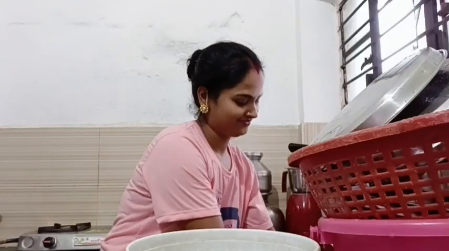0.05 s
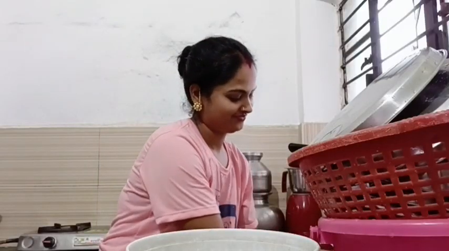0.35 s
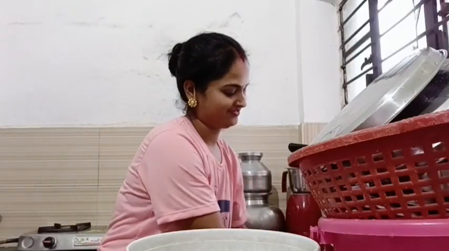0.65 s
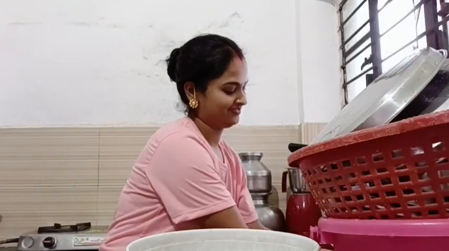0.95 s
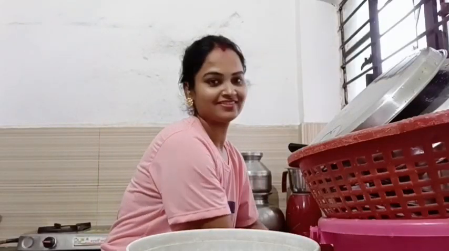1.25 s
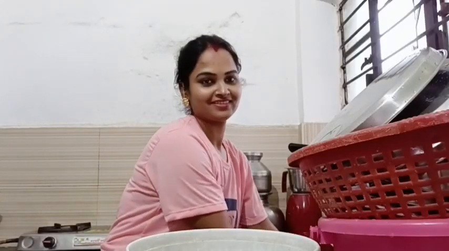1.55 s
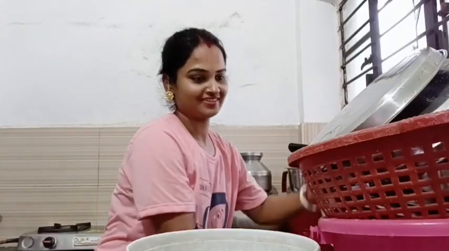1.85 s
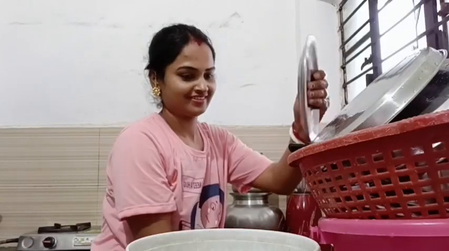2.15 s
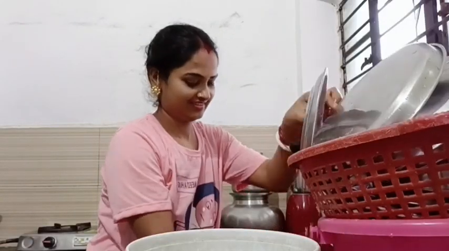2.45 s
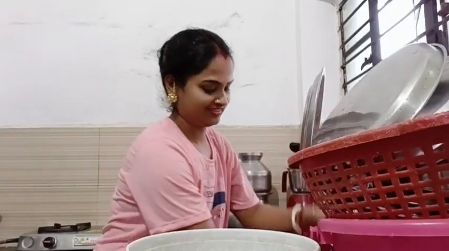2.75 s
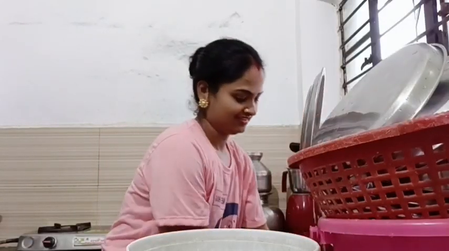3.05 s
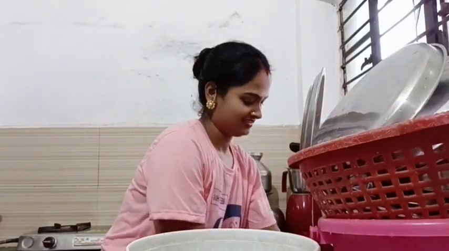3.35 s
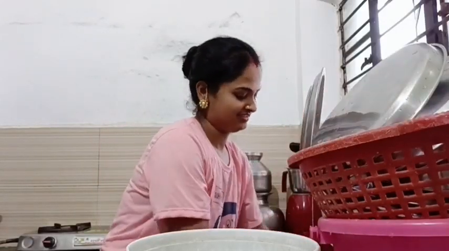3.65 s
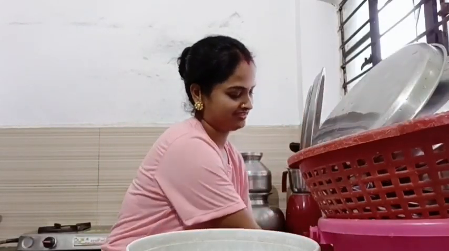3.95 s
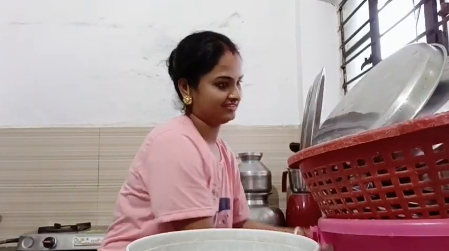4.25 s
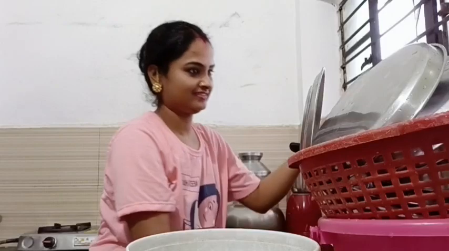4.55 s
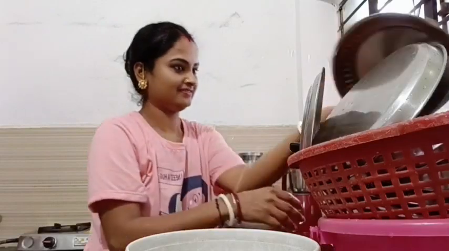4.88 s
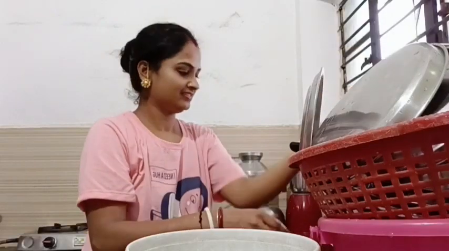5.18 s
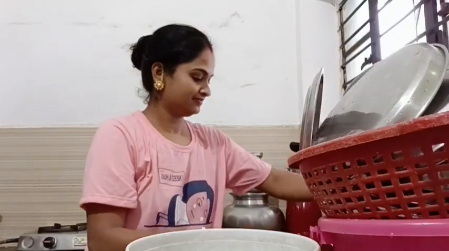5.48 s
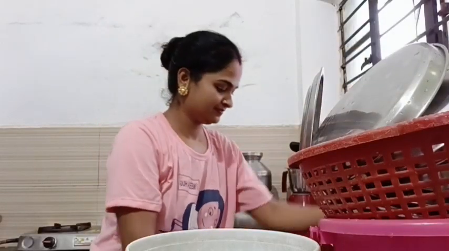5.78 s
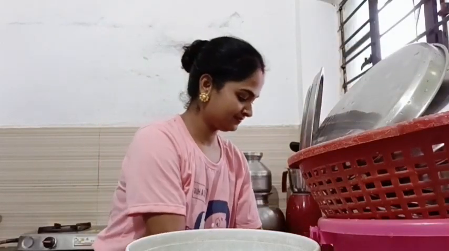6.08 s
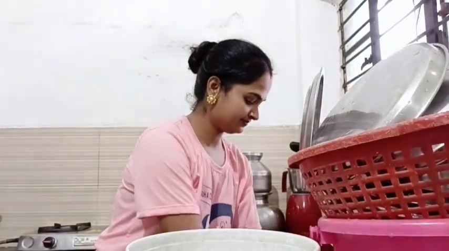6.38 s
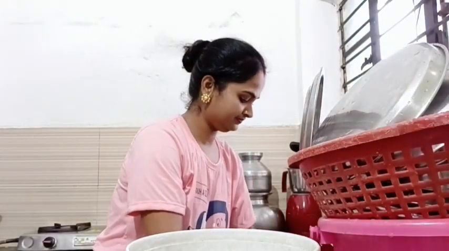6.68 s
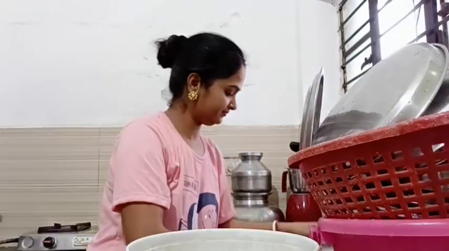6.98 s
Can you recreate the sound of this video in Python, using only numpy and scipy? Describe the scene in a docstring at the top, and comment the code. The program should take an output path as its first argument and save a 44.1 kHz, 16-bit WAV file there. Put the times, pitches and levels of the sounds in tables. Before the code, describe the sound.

Steel dishes are rinsed by hand in a small kitchen, clanking and ringing over running, sloshing water and occasional sink booms.

```python
"""Steel dishes knock and ring as they are rinsed by hand in a small, hard-walled kitchen.
A thin pan, plates and a bowl are struck, chatter and ring in their modes, among light ticks and scrapes.
Water runs throughout as bubbles and spray, with sloshes from the hands, glugs and a few sharp slaps.
Now and then the sink booms under a pour or a dish set down, over faint room air and hum."""
import sys
import numpy as np
from scipy import signal
from scipy.fft import rfft, irfft
from scipy.io import wavfile
from scipy.ndimage import uniform_filter1d, minimum_filter1d

SR = 44100
rng = np.random.default_rng(int(sys.argv[2]) if len(sys.argv) > 2 else 0)


def wav_out(sig):
    """Save sig, one row per channel (or a flat mono array), as 16-bit PCM at SR to the path in sys.argv[1]."""
    wavfile.write(sys.argv[1], SR, np.round(np.clip(np.atleast_2d(sig).T, -1, 1) * 32767).astype(np.int16))


N = 309582

LOW_HZ, MID_HZ, TREBLE_HZ = (270, 1200), (1200, 4000), (4000, 16000)
EVENT_GAIN = np.sqrt(SR / 20)   # unit energy to unit power over 50 ms


def from_db(db):
    """Decibels to gain."""
    return 10 ** (np.asarray(db) / 20)


def unit_power(x):
    """Scale to unit power."""
    return x / np.sqrt(np.mean(x ** 2) + 1e-20)


def unit_energy(x):
    """Scale to unit energy."""
    return x / np.sqrt(np.sum(x ** 2, axis=-1, keepdims=True) + 1e-20)


def at_hz(points, hz):
    """Read a table on a log-frequency axis."""
    freq_hz, value = np.transpose(points)
    return np.interp(np.log(hz + 0.00062), np.log(freq_hz), value)


def band(x, edges_hz):
    """Band-pass between two edges."""
    return signal.sosfilt(signal.butter(4, edges_hz, "band", fs=SR, output="sos"), x + 1e-18)


def coloured(x, spectrum, size=2048):
    """Minimum-phase filter with the given spectrum."""
    cepstrum = irfft(np.log(from_db(at_hz(spectrum, np.fft.rfftfreq(size, 1 / SR)))))
    cepstrum[1:size // 2] *= 2
    cepstrum[size // 2 + 1:] = 0
    return signal.oaconvolve(x, irfft(np.exp(rfft(cepstrum))))[:len(x)]


def decay(t, t60_s):
    """Envelope that falls 60 dB in t60_s."""
    return np.exp(-np.log(1000) * t / max(t60_s, 1e-3))


def mode(t, hz, t60_s):
    """One struck mode of unit energy."""
    return unit_energy(np.sin(2 * np.pi * hz * t) * decay(t, t60_s))


def swells(rows, release_t60_s):
    """One gain curve per level column: events rise, hold and die away; overlaps add in power."""
    t, power = np.arange(N) / SR, 0
    for start_s, swell_s, length_s, *levels_db in rows:
        attack = np.clip((t - start_s) / max(swell_s, 1e-3), 0, 1)
        release = decay(np.clip(t - start_s - length_s, 0, 1), release_t60_s)
        power = power + (from_db(levels_db)[:, None] * attack * release) ** 2
    return np.sqrt(power)


# freq_hz, gain_db
AIR_SPECTRUM = [(25, -9), (45, -17), (65, 8.5), (90, -7), (140, 6.5), (250, -8), (1000, -28),
                (15000, -31.5)]


def room_air():
    """Steady noise with a low hum."""
    return unit_power(coloured(rng.standard_normal(N), AIR_SPECTRUM))


# freq_hz, t60_s
TAIL_DECAY = [(100, 0.097), (300, 0.33), (1000, 0.46), (4000, 0.49), (8000, 0.32), (16000, 0.12)]
# freq_hz, left_right_correlation
TAIL_CORRELATION = [(60, -0.87), (290, 1), (640, 0.53), (1400, -0.15), (3000, 0.16), (15000, 0.77)]


def kitchen(x, direct_db, right_delay_s, build_s=0.00043):
    """Direct sound, left first, plus a diffuse tail off the tiles that dies band by band."""
    t, edges_hz = np.arange(int(0.7 * SR)) / SR, np.geomspace(60, 18000, 13)
    white, tail = rng.standard_normal((len(edges_hz), 2, len(t))), 0
    for noise, low_hz, high_hz in zip(white, edges_hz, edges_hz[1:]):
        mid, side = band(noise, (low_hz, high_hz))
        hz = np.sqrt(low_hz * high_hz)
        correlation = np.clip(at_hz(TAIL_CORRELATION, hz), -1, 1)
        stereo = np.sqrt(1 + correlation) * mid + np.sqrt(1 - correlation) * side * [[1], [-1]]
        tail = tail + stereo * decay(t, at_hz(TAIL_DECAY, hz))
    spectrum = rfft(tail * (1 - np.exp(-t / build_s)), 2 * len(t))
    # dense reflections even out the response
    smooth_power = uniform_filter1d(np.mean(abs(spectrum) ** 2, axis=0), size=61)
    tail = irfft(spectrum / np.sqrt(smooth_power + 1e-3))[:, :len(t)]
    direct = np.sinc(np.arange(len(t)) - np.array([[0], [round(right_delay_s * SR)]]))
    response = unit_energy(unit_energy(tail) + from_db(direct_db) * direct)
    return signal.oaconvolve(x[None], response, axes=1)[:, :N]


# pitch_hz, level_db, t60_s
SINK_RESONANCES = [(82, 3, 0.033), (86.4, 2, 0.39), (128.3, 5.5, 0.56), (164, 4, 0.25), (197, -0.5, 0.016)]
# start_s, swell_s, length_s, level_db
SINK_BOOMS = [(0.0, 0.0064, 0.064, -38.5), (0.2, 0.017, 0.099, -47), (0.55, .04, 0.16, -44.5),
              (0.68, 0.025, 0.33, -31), (2.15, 0.026, .15, -52.5), (2.97, 0.051, 0.19, -44.5),
              (3.95, .06, 0.076, -55), (4.87, 0.061, 0.24, -51.5), (5.36, .02, 0.016, -40),
              (5.48, 0.048, 0.14, -45), (6.46, 0.017, 0.075, -37), (6.55, 0.01, 0.13, -26.5),
              (6.908, 0.022, 0.081, -12.5)]


def sink():
    """Falling water and set-down dishes shake the sink bottom, which booms in a few damped modes."""
    t = np.arange(SR // 4) / SR
    body = sum((-1) ** k * from_db(level_db) * mode(t, hz, t60_s)
               for k, (hz, level_db, t60_s) in enumerate(SINK_RESONANCES))
    boom = signal.oaconvolve(rng.standard_normal(N), body)[:N]
    boom /= np.sqrt(uniform_filter1d(boom ** 2, size=3000) + 1e-9)
    return band(swells(SINK_BOOMS, release_t60_s=0.16)[0] * boom, (55, 400))


def bubbles(edges_hz, per_s, cycles, spread_db, rise, hiss_db, pitches=24):
    """Random bubbles ring and rise in pitch over a hiss of finer drops; unit power."""
    births = np.flatnonzero(rng.random(N) < per_s / SR)
    strengths = from_db(spread_db * np.minimum(rng.exponential(1, N), 3.5)) * rng.choice([-1, 1], N)
    pitch_index = rng.integers(0, pitches, N)
    hiss, pings = rng.standard_normal(N), np.zeros(N)
    for k, hz in enumerate(np.geomspace(*edges_hz, pitches)):
        t60_s = cycles / hz
        t = np.arange(int(t60_s * SR) + 2) / SR
        phase = 2 * np.pi * hz * t * (1 + rise * t / t60_s / 2)
        ping = unit_energy(np.sin(phase) * decay(t, t60_s)) * np.sqrt(hz)
        starts = births[pitch_index[births] == k, None]
        samples = starts + np.arange(len(t))
        pings += np.bincount(samples.ravel(), (strengths[starts] * ping).ravel(), N)[:N]
    drops = from_db(hiss_db) * unit_power(band(hiss, edges_hz))
    return unit_power(unit_power(band(pings, edges_hz)) + drops)


def surge(per_s, depth_db):
    """Gain of a flow that spurts unevenly as the hands move through it."""
    points = rng.standard_normal(600)
    return from_db(depth_db * np.interp(np.arange(N) * per_s / SR, np.arange(len(points)), points))


# time_s, level_db
STREAM_FLOW = [(0.0, -31), (0.65, -31.5), (1.05, -33.5), (1.5, -32.5), (1.59, -43), (1.7, -33),
               (2.2, -32.5), (3.9, -32), (4.06, -37.5), (4.18, -38), (4.36, -34), (4.8, -33), (5.55, -34.5),
               (5.79, -38.5), (6.15, -38.5), (6.44, -47), (6.53, -47.5), (7.02, -27.5)]
# start_s, swell_s, length_s, gurgle_db, splash_db, spray_db
HAND_SLOSHES = [(0.0, 0.0019, .06, -7.5, -17, -26), (0.135, 0.011, 0.085, -10.5, -17.5, -37),
                (0.29, 0.038, 0.062, -15.5, -23, -28), (0.43, .02, .17, -37, -36, -22.5),
                (0.60, 0.075, 0.25, -10.5, -42, -46), (0.92, .02, 0.15, -19.5, -35, -56),
                (1.13, 0.011, 0.11, -25.5, -29.5, -36), (1.25, 0.019, 0.052, -36, -26.5, -33),
                (1.61, 0.012, 0.013, -45, -28, -43), (1.80, 0.03, 0.047, -21.5, -20.5, -30),
                (1.95, 0.017, 0.11, -29.5, -27, -31), (2.34, 0.03, 0.15, -30, -27, -42),
                (2.59, 0.03, 0.089, -17.5, -27, -67), (2.75, 0.16, 0.18, -23.5, -21.5, -25),
                (3.015, 0.013, 0.15, -33, -29.5, -34.5), (3.39, .02, 0.079, -31.5, -23.5, -30),
                (3.65, 0.018, 0.19, -43.5, -24.5, -28), (3.83, 0.1, 0.079, -32, -23, -31),
                (4.28, 0.019, 0.045, -52, -32, -46), (4.44, 0.049, 0.064, -33, -25.5, -41),
                (4.55, 0.016, 0.24, -29, -34, -51), (4.94, 0.031, 0.27, -18, -21.5, -29.5),
                (5.45, 0.065, .22, -25.5, -29, -35), (5.985, 0.037, 0.032, -28.5, -33, -35),
                (6.075, 0.017, 0.025, -16.5, -19.5, -22.5), (6.22, 0.019, 0.02, -21, -22, -39),
                (6.475, 0.018, 0.15, -15.5, -22.5, -30), (6.69, 0.026, 0.14, -15.5, -19, -31),
                (6.85, 0.11, 0.3, -12, -17.5, -28)]
# freq_hz, gain_db
WATER_SPECTRUM = [(270, -13), (400, -6.5), (570, -8), (800, -12), (1200, -3), (2000, 5), (2800, 5),
                  (4200, 1.5), (6300, 2), (8000, -3), (11500, -18), (15500, -9)]


def water():
    """Stream and sloshes feed large gurgling bubbles, small splashing ones and drops on the steel."""
    layers = [bubbles((480, 1080), per_s=400, cycles=16.7, spread_db=2, rise=0.1, hiss_db=-8),
              bubbles(MID_HZ, per_s=900, cycles=38, spread_db=7.5, rise=0.087, hiss_db=-7.5),
              bubbles((4000, 9500), per_s=900, cycles=17, spread_db=8, rise=0.043, hiss_db=-3)]
    gurgle, splash, spatter = (unit_power(coloured(x, WATER_SPECTRUM)) for x in layers)
    spatter *= surge(per_s=25, depth_db=2)
    mist = bubbles((9500, 16000), per_s=830, cycles=66, spread_db=9, rise=0.0525, hiss_db=-0.5)
    mist = unit_power(coloured(mist, WATER_SPECTRUM)) * surge(per_s=25, depth_db=-1)
    spray = from_db(-1.5) * spatter + from_db(-6) * mist
    flow = from_db(np.interp(np.arange(N) / SR, *np.transpose(STREAM_FLOW)))
    slosh_gurgle, slosh_splash, slosh_spray = swells(HAND_SLOSHES, release_t60_s=0.27)
    return (np.hypot(slosh_gurgle, from_db(-30.5) * flow) * from_db(-6.5) * gurgle
            + np.hypot(slosh_splash, from_db(-5.5) * flow) * splash
            + np.hypot(slosh_spray, from_db(1.5) * flow) * spray)


# start_s, pitch_hz, level_db
AIR_POCKETS = [(0.0, 932, -23.5), (0.065, 563, -23.5), (0.14, 586, -19.5), (0.372, 604, -27),
               (0.918, 598, -18), (1.152, 1093, -34), (1.624, 890, -33), (1.807, 1070, -35.5),
               (2.57, 658, -31.5), (2.667, 678, -26.5), (2.837, 672, -33.5), (2.919, 610, -28.5),
               (3.014, 975, -32.5), (3.141, 657, -40), (3.68, 694, -45), (3.88, 707, -48),
               (4.565, 700, -39), (5.767, 550, -44.5), (6.005, 550, -37.5), (6.096, 880, -27),
               (6.147, 596, -28), (6.481, 508, -25.5), (6.531, 585, -24), (6.76, 463, -26.5),
               (6.808, 570, -28), (6.914, 938, -28.5)]


def glugs(cycles=44, rise=0.16, swell_s=0.0034):
    """An air pocket closes under water and rings, its pitch rising as it nears the surface."""
    out, t = np.zeros(N + SR), np.arange(SR // 4) / SR
    for start_s, hz, level_db in AIR_POCKETS:
        t60_s = cycles / hz
        pitch_hz = hz * (1 + rise * (np.minimum(t / t60_s, 1) - 0.1))
        envelope = decay(t, t60_s) * (1 - np.exp(-t / swell_s))
        ping = np.sin(2 * np.pi * np.cumsum(pitch_hz) / SR) * envelope
        start = round(start_s * SR)
        out[start:start + len(t)] += from_db(level_db) * unit_energy(ping) * EVENT_GAIN
    return out[:N]


# start_s, pitch_hz, level_db, length_s
EDGE_SCRAPES = [(1.706, 2010, -30.5, 0.13), (3.853, 2610, -29.5, 0.053), (4.769, 2720, -23, 0.03),
                (5.294, 2920, -19, 0.014), (5.571, 5150, -25, 0.022), (5.823, 2010, -40.5, 0.037),
                (5.913, 3050, -26.5, 0.019)]


def scrapes(band_ratio=1.11):
    """A steel edge sticks and slips on steel, rasping in one broad resonance."""
    out = np.zeros(N + SR)
    for start_s, hz, level_db, length_s in EDGE_SCRAPES:
        stroke = np.hanning(round(length_s * SR)) ** 0.5
        slips = band(rng.standard_normal(SR // 4), (hz / band_ratio, hz * band_ratio))[:len(stroke)]
        start = round(start_s * SR)
        out[start:start + len(slips)] += from_db(level_db) * unit_power(slips * stroke)
    return out[:N]


def impacts(hits, modes, spectrum, wash_t60_s, rattle_per_s, rattle_db, detune):
    """A blow and its chatter; each contact rings a dense wash and a few clear modes."""
    out, t = np.zeros(N + SR), np.arange(SR // 3) / SR
    for start_s, *bands_db, ring_db, rattle_s in hits:
        touches = rng.random(len(t)) < rattle_per_s / SR
        strengths, noise = rng.standard_normal((2, len(t)))
        signs = rng.choice([-1, 1], len(modes))
        shifts = 1 + detune * rng.standard_normal(len(modes))   # grip and clinging water
        contacts = from_db(rattle_db) * unit_energy(touches * strengths * np.exp(-t / (2 * rattle_s)))
        contacts[0] = 1   # the blow itself
        wash = coloured(noise * decay(t, wash_t60_s), spectrum)
        start = round(start_s * SR)
        for (low_hz, high_hz), band_db in zip((LOW_HZ, MID_HZ, TREBLE_HZ), bands_db):
            response = unit_energy(band(wash, (low_hz, high_hz)))
            for sign, shift, (hz, mode_db, t60_s) in zip(signs, shifts, modes):
                if low_hz < hz <= high_hz:
                    response += sign * from_db(mode_db + ring_db) * mode(t, hz * shift, t60_s)
            ringing = unit_energy(signal.fftconvolve(contacts, response)[:len(t)])
            out[start:start + len(t)] += from_db(band_db) * ringing * EVENT_GAIN
    return out[:N]


# start_s, low_db, mid_db, treble_db, ring_db, rattle_s
TICKS_AND_HISS = [(1.399, -77, -25.5, -16.5, -18, 0.041), (1.409, -41, -39, -34, -20, 0.034),
                  (3.626, -65, -38.5, -31.5, 0, 0.0095), (4.187, -64, -57, -37.5, -20, 0.0041),
                  (4.385, -75, -36.5, -37, -28, 0.039), (5.59, -59, -53, -37, -3, 0.019),
                  (5.982, -77, -40, -31.5, -7, 0.014), (6.449, -39, -56, -34.5, -5, 0.03)]
# pitch_hz, level_db, t60_s
TICK_RESONANCES = [(790, 6, .2), (2490, 8.5, 0.066), (4270, -13, 0.073), (5570, -15, .2),
                   (11200, -8, 0.033), (15000, -1, .04)]
# freq_hz, gain_db
TICK_SPECTRUM = [(270, -65), (800, -12), (1500, -9.5), (2700, 0), (3400, -8), (4400, -2), (6000, 3),
                 (8000, 3), (11500, -5), (15500, 5.5)]


def ticks_and_hiss():
    """Light, bright metallic ticks and one short hiss."""
    return impacts(TICKS_AND_HISS, TICK_RESONANCES, TICK_SPECTRUM,
                   wash_t60_s=0.011, rattle_per_s=460, rattle_db=-6, detune=0.0123)


# start_s, low_db, mid_db, treble_db, ring_db, rattle_s
BOWL_HITS = [(3.23, -64, -15, -18, -17, 0.026), (3.238, -56, -9, -14.5, 7.5, 0.053),
             (3.26, -52, -17, -36, 11, 0.031), (3.348, -34, -21, -29, -10, 0.011),
             (3.397, -29, -12, -23.5, -12, 0.0095), (3.45, -49, -31, -25.5, 3, 0.019)]
# pitch_hz, level_db, t60_s
BOWL_RESONANCES = [(1910, -14, 0.24), (1955, -6.5, 0.44), (2086, -12, 0.13), (5230, -10, 0.042),
                   (11930, -28, 0.091)]
# freq_hz, gain_db
BOWL_SPECTRUM = [(270, -18), (450, -15), (900, -5), (1300, -14.5), (1950, 7), (2700, -5), (3800, -15),
                 (5300, -8.5), (8000, -13.5), (11500, -18), (15500, -9)]


def bowl():
    """A small bowl clangs in the sink."""
    return impacts(BOWL_HITS, BOWL_RESONANCES, BOWL_SPECTRUM,
                   wash_t60_s=0.028, rattle_per_s=210, rattle_db=-1.5, detune=0.0031)


# start_s, low_db, mid_db, treble_db, ring_db, rattle_s
CLINKS_AND_SLAPS = [(0.15, -19, -17.5, -60, 2, 0.011), (0.449, -21, -14.5, -35, 0.5, 0.003),
                    (0.903, -17.5, -25.5, -34, -3, 0.0076), (1.61, -74, -25.5, -32, -1, 0.07),
                    (2.124, -25, -10, -23, 0, 0.008), (2.17, -28.5, -17, -25, -11, 0.056),
                    (2.218, -19.5, -16.5, -23, -12, 0.04), (2.237, -31, -16, -33, -21, 0.054),
                    (2.3, -17.5, -15, -31, 0, 0.15), (3.021, -25, -27.5, -43, -6, 0.01),
                    (4.648, -56, -38.5, -37, -11, 0.024), (6.078, -40, -30, -32, -20, 0.0093),
                    (6.236, -38, -24, -35.5, -29, 0.011), (6.75, -15.5, -21.5, -44, -19, 0.012)]
# pitch_hz, level_db, t60_s
CLINK_RESONANCES = [(341, -13, 0.39), (437.4, -12.5, 0.39), (570, -36, 0.21), (710, -0.5, 0.41),
                    (1376, -18, 0.64), (1714, -10.5, .15), (2010, -5.5, 0.12), (2586, -10, 0.16),
                    (2660, -17.5, 0.2), (4500, -28, 0.21), (4640, -31.5, 0.24), (5600, -48, .35),
                    (6870, -27, 0.54), (6900, -31, 0.44), (11500, -24, 0.11), (14030, -15, 0.15),
                    (15400, -12, 0.13)]
# freq_hz, gain_db
CLINK_SPECTRUM = [(270, -5.5), (450, 3.5), (750, 5.5), (1200, -7), (2000, -6), (2800, -8), (4000, -17.5),
                  (5700, 1.5), (8000, 2), (11500, -11.5), (15500, 0)]


def plates_and_slaps():
    """Plates clink and rattle, and a few splashes of water slap sharply."""
    return impacts(CLINKS_AND_SLAPS, CLINK_RESONANCES, CLINK_SPECTRUM,
                   wash_t60_s=0.041, rattle_per_s=400, rattle_db=-7.5, detune=0.0096)


# start_s, low_db, mid_db, treble_db, ring_db, rattle_s
PAN_HITS = [(0.423, -16.5, -20, -23, -11.5, 0.018), (0.536, -15.5, -12, -25, -1.5, 0.03),
            (0.596, -20.5, -12, -49, 1, 0.048), (0.702, -7, -12.5, -21, 7.5, 0.011),
            (0.716, -9.5, -27, -34, -20, 0.0089), (0.801, -33, -13.5, -30.5, 14.5, 0.042),
            (0.85, -40, -16.5, -34.5, 4.5, 0.0082), (4.208, -31.5, -29, -34, 18, 0.0086),
            (4.829, -22.5, -14, -20, -6, 0.008), (4.879, -9.5, -13, -19, -7, 0.0061),
            (4.96, -21.5, -17.5, -20, 9, 0.043), (5.027, -14, -17.5, -23.5, -5, 0.037),
            (5.312, -25.5, -19.5, -22, -4, 0.048), (5.374, -17.5, -16, -21, -7.5, 0.0057),
            (5.586, -24.5, -28, -33, -1.5, 0.0094)]
# pitch_hz, level_db, t60_s
PAN_RESONANCES = [(321, 5, 0.24), (427, -2.5, 0.22), (454, -15.5, 0.21), (607, -10.5, 0.65),
                  (767, -8, 0.27), (956, -24.5, 0.3), (1155, -6.5, 0.23), (1440, -17.5, 0.08),
                  (1960, -7.5, 0.28), (1971, -1, 0.038), (2030, -12.5, 0.314), (2560, -39, 0.21),
                  (3570, -34, 0.34), (5430, -22, 0.22)]
# freq_hz, gain_db
PAN_SPECTRUM = [(270, -20), (420, 3.5), (700, 10), (1100, -3.5), (1500, -0.5), (2000, -5.5), (3000, -3.5),
                (4200, -9.5), (5500, -5.5), (8000, -14.5), (11500, -25.5), (15500, -13)]


def pan():
    """A thin pan knocks about in the basin."""
    return impacts(PAN_HITS, PAN_RESONANCES, PAN_SPECTRUM,
                   wash_t60_s=0.033, rattle_per_s=400, rattle_db=-6, detune=0.0055)


def scene():
    """Dishes and water in the kitchen, over room air and the boom of the sink."""
    clatter = (pan() + from_db(1) * plates_and_slaps() + from_db(-2.45) * bowl()
               + from_db(3) * ticks_and_hiss() + scrapes())
    highpass = signal.butter(5, 275, "high", fs=SR, output="sos")   # the clatter carries nothing below about 275 Hz
    dishes = kitchen(signal.sosfilt(highpass, clatter + 1e-18), direct_db=-7.5, right_delay_s=0.00012)
    basin = from_db(-1.1) * water() + from_db(2) * glugs()
    rinsing = kitchen(basin, direct_db=-1.5, right_delay_s=0.00011)
    return dishes + rinsing + from_db(-58.5) * room_air() + sink()


# freq_hz, gain_db
LEFT_PORT_RESPONSE = [(100, -1), (4000, 0.52), (7500, 0.5), (8600, -4), (9400, -18), (10400, -2),
                      (11300, 9.5), (16000, 2.5)]
RIGHT_PORT_RESPONSE = [(100, -3), (4000, -0.53), (7500, -1), (8600, -6), (9400, -7), (10400, -1),
                       (11300, 1), (16000, -8.5)]


def record(dry):
    """Microphone ports notch near 10 kHz, the right duller; a limiter ducks peaks; the top is cut."""
    heard = np.array([coloured(dry[0], LEFT_PORT_RESPONSE), coloured(dry[1], RIGHT_PORT_RESPONSE)])
    allowed_gain = np.minimum(1, 0.92 / (abs(heard).max(axis=0) + 1e-9))
    limiter_gain = uniform_filter1d(minimum_filter1d(allowed_gain, size=301), size=301)
    lowpass = signal.ellip(12, 0.1, 80, 15900, fs=SR, output="sos")
    return signal.sosfilt(lowpass, limiter_gain * heard)


dry = scene()
out = record(dry)
wav_out(out)
```